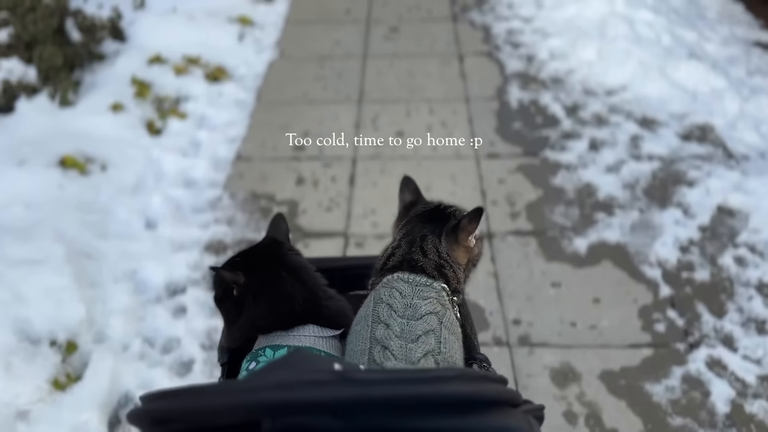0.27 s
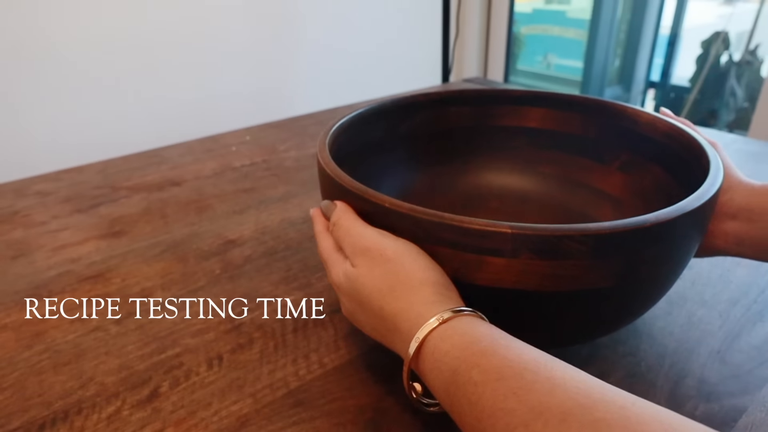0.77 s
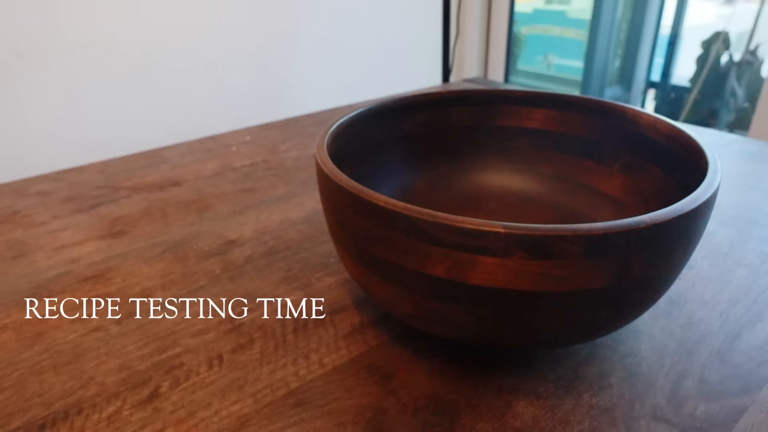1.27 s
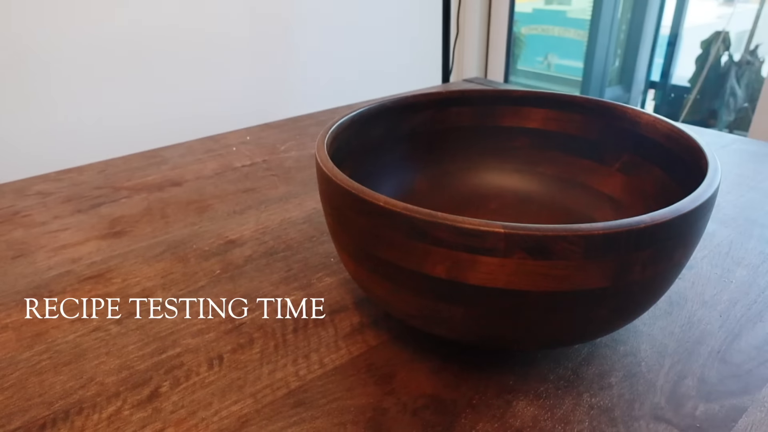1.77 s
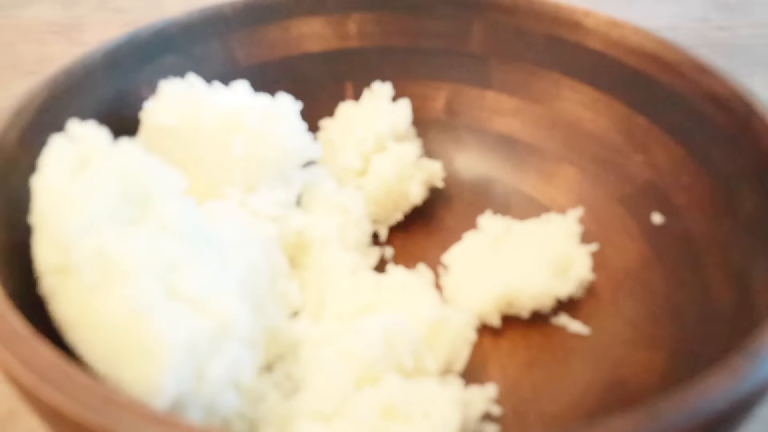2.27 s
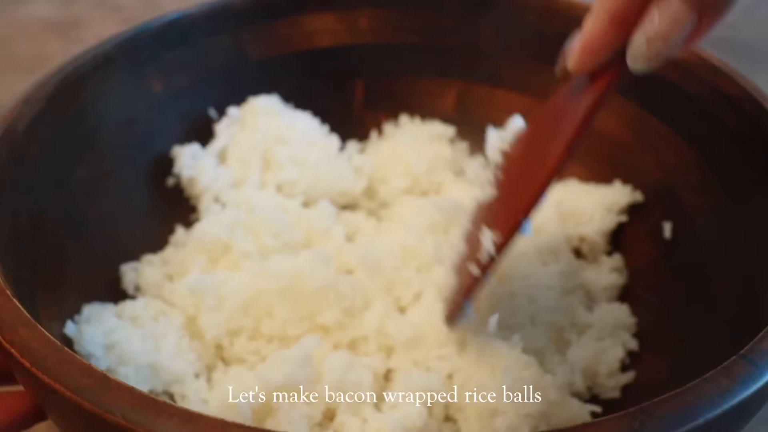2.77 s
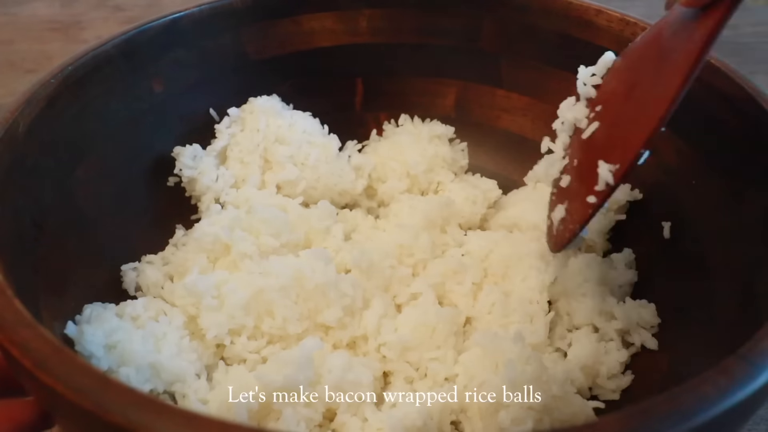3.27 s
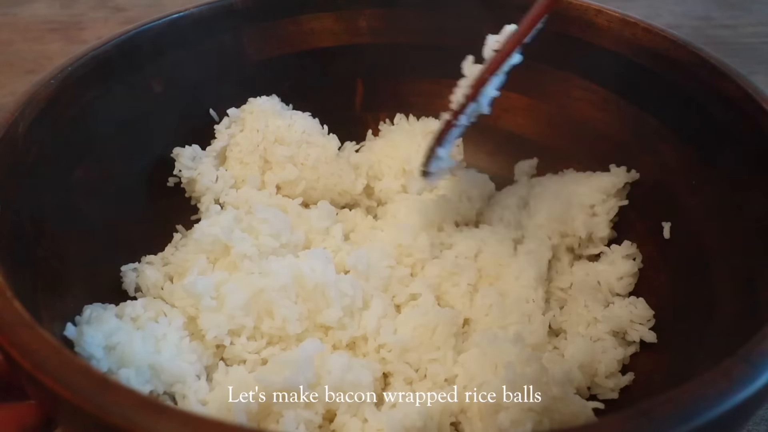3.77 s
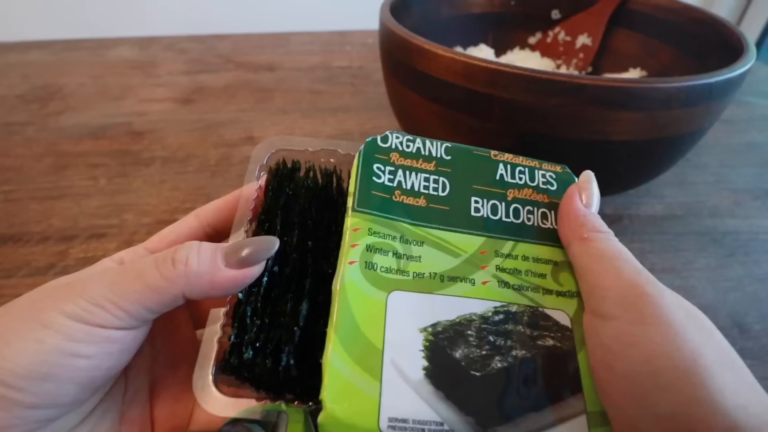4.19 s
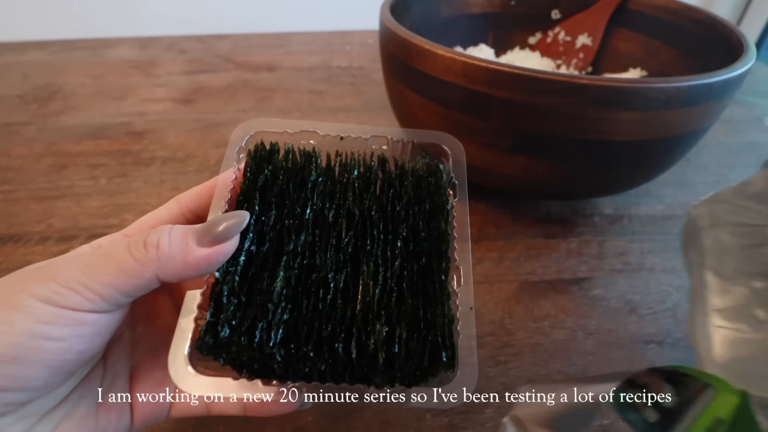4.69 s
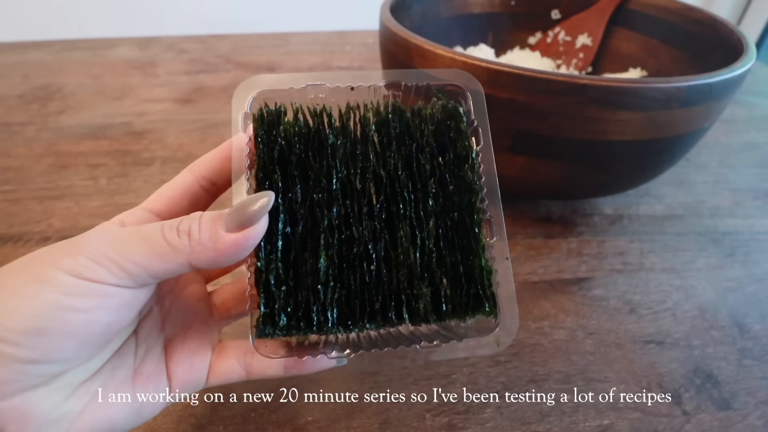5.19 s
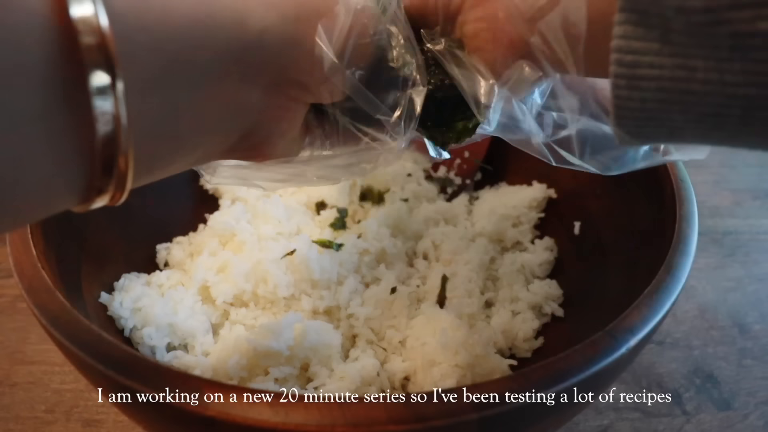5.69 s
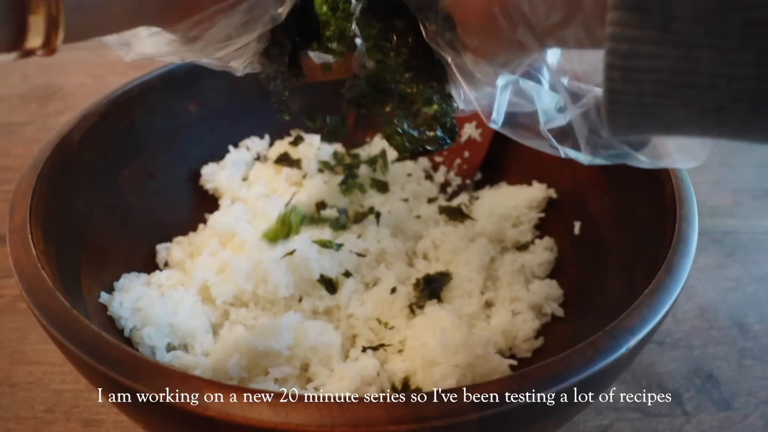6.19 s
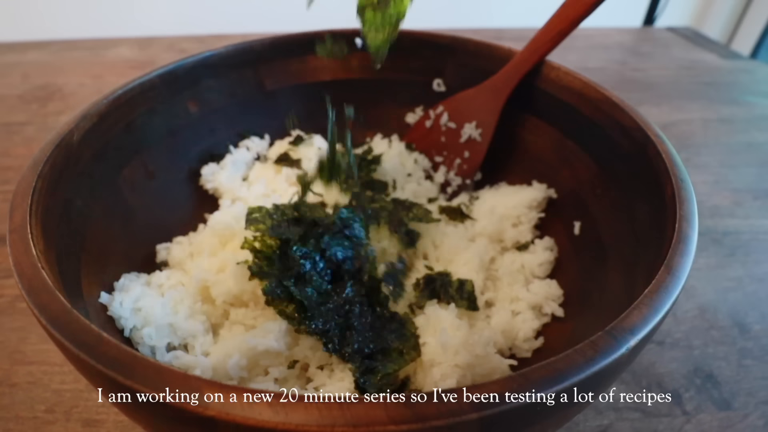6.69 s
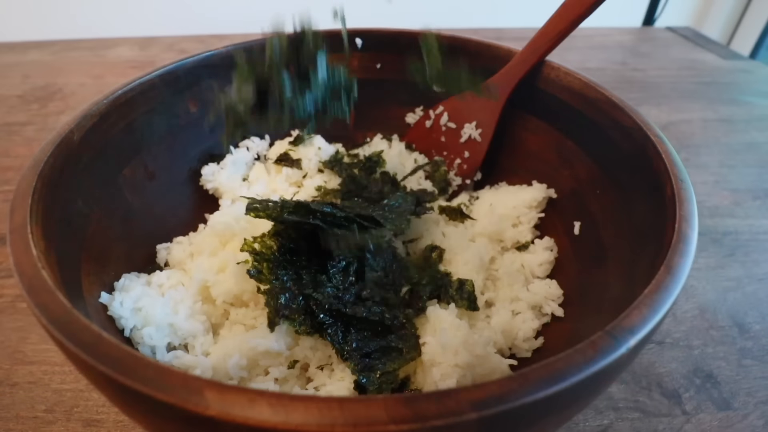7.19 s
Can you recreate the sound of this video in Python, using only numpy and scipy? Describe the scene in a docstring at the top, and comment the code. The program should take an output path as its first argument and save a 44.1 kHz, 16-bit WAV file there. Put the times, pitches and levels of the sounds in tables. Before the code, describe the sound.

Short outdoor rolling rattle cuts to a kitchen: hollow bowl thunks, soft sticky rice stirring, crackling plastic tray, then bright crinkling and sharp seaweed cracks.

```python
"""Stroller on wet paving, then rice and seaweed in a kitchen

Tyres hiss brightly and a frame rattles: crackle, noise and snaps, cut off as the kitchen begins.
A wooden bowl is set down and judders on a table: modal ring driven by contact pulses and slips.
Cooked rice squeaks in and is cut with a paddle: low pushes, sticky crackle, smacks.
A plastic seaweed tray slides out of its wrapper: scrape and buckling snaps. Hands in thin
plastic gloves crush the sheets over the rice: crinkle, cracks and low handling noise."""
import sys
import numpy as np
from scipy import signal
from scipy.io import wavfile
from scipy.ndimage import uniform_filter1d

SR = 44100
rng = np.random.default_rng(int(sys.argv[2]) if len(sys.argv) > 2 else 0)


def output_pcm(signal):
    """Save a mono or channel-first signal as 16-bit PCM at the path in sys.argv[1].

    Samples are clipped to [-1, 1] before scaling.
    """
    pcm = np.clip(np.atleast_2d(signal).T, -1, 1) * 32767
    wavfile.write(sys.argv[1], SR, np.round(pcm).astype(np.int16))


N = 328545
TIME = np.arange(N) / SR  # s
INDOORS_S, CRUSH_START_S = 0.513, 5.643  # street gives way to kitchen; hands start on the sheets
EDGE_HZ = 15950  # upper band limit

# All table levels and *_REL_DB are relative, ahead of the gains of their mix; t60/s is before filtering.

# Gloves and dry sheets
# spectrum of the crinkle [f/Hz, level/dB]
FILM_SPECTRUM = [(180, -44.5), (300, -11), (425, -8), (870, -2), (1140, -2.5), (1410, -2.5), (1970, -3.5),
                 (3950, -3), (4590, -9.5), (5700, -3.5), (6620, -7), (7690, -3), (10700, -12), (14500, -11),
                 (16000, -16)]
# narrow peaks and broad dips in the crinkle [f/Hz, half-width/Hz, height/dB]
CRINKLE_PEAKS = [(1392, 62, 7), (4000, 77, 4.5), (4900, 250, 2.5), (7700, 940, -1), (11080, 430, -4.5)]
# spectrum of the low handling rumble [f/Hz, level/dB]
HANDLING_SPECTRUM = [(15, -11), (45, -1.5), (110, 1.5), (250, -4.5), (450, -10.5), (1000, -28.5)]
# sheets break down as they are rubbed [t/s, crinkle level/dB, creases giving way/(1/s)]
RUBBING = [(5.64, -25.5, 5640), (6.4, -26, 5000), (6.55, -29.5, 2200), (6.95, -33, 690), (7.2, -34, 890),
           (7.45, -45.5, 920)]
# hands squeeze [start t/s, length/s, crinkle level/dB, rumble level/dB]
SQUEEZE_EVENTS = [(5.624, 0.043, -17, -32.5), (5.795, .07, -20, -44), (5.969, 0.077, -21, -44),
                  (6.05, 0.12, -23.5, -42), (6.299, .13, -24, -36), (6.815, 0.034, -27, -33),
                  (6.894, 0.024, -29, -26), (6.965, 0.019, -29, -28), (7.286, 0.075, -32, -44)]
# dry sheets crack [t/s, peak level/dB, tilt/(dB/octave), t60/s]
CRACK_EVENTS = [(5.644, -10, 1, .014), (5.654, -11, 6, .016), (5.9134, -8, 0, 0.015),
                (6.0211, 2.5, 4, .017), (6.0982, 0, 4, .022), (6.1484, -12, 1, 0.013),
                (6.1934, -6, 1, .018), (6.4504, -7, -1, .019), (6.6147, -6.5, -2.5, .016),
                (6.6852, -13, 2.5, 0.017), (6.7521, -8.5, -2.5, 0.021), (6.793, -14, -2.5, 0.037),
                (6.8491, -5, 1.5, .016), (6.8998, -6, 4, .013), (6.9163, -6.5, -1.5, .011),
                (6.9391, -21, -7, 0.017), (6.95, -3.5, 3, 0.018), (6.9996, -1, 2, 0.017),
                (7.0822, -5.5, 1.5, .014), (7.0929, -14, -3.5, .021), (7.1653, -6.5, 1.5, .014),
                (7.1805, -7.5, 0, .014), (7.2143, -5, 0, 0.0083), (7.233, -12, 2, .012),
                (7.2392, 2, 4.5, 0.016), (7.252, -8, 0, .013), (7.3465, -13, 0.5, .022)]
# flakes land on the rice [t/s, peak level/dB, f/Hz]
FLAKE_LANDINGS = [(6.339, -26.5, 169), (6.842, -20, 158), (6.925, -21, 205), (7.075, -28, 109),
                  (7.241, -20, 108)]
# hollow between the palms changes size [t/s, length/s, level/dB, first f/Hz, last f/Hz]
PALM_GLIDES = [(5.645, 0.038, -34, 752, 574), (5.835, 0.028, -32, 806, 480), (5.86, 0.028, -30, 470, 674),
               (5.995, 0.025, -34.5, 804, 556), (6.435, 0.036, -34.5, 592, 974),
               (6.52, 0.023, -36, 553, 295)]
SQUEEZE_RISE_S, SQUEEZE_T60_S = 0.026, 0.28
FIZZ_REL_DB, HANDLING_REL_DB = -7, -40  # crinkle above 9 kHz; steady rumble of the hands
CLUMP_SPREAD_DB, FUMBLE_SPREAD_DB = 1, 1.43  # quick clusters of creases; uneven grip
CREASE_SPREAD_DB = 2.3

# Rice and paddle
# spectrum of sticky grains [f/Hz, level/dB]
STICKY_SPECTRUM = [(350, -24), (600, -6), (1190, -12), (1410, 5), (2180, -2.5), (2440, -2), (2720, -2.5),
                   (4050, -6.5), (10700, -20), (14500, -31), (16000, -11)]
# spectrum of the table under pressure [f/Hz, level/dB]
TABLE_SPECTRUM = [(10, -11.5), (30, -3.5), (50, -18.5), (90, -24), (200, -35), (600, -64)]
# wood ring under a soft blow [f/Hz, level/dB]
SOFT_WOOD_SPECTRUM = [(120, -3.5), (200, 0.5), (330, -12.0), (600, -10.5), (1500, -26), (6000, -45)]
# murmur under the paddle [f/Hz, level/dB]
MURMUR_SPECTRUM = [(60, -5), (120, 0.5), (200, -1.5), (350, 2), (600, -6.5), (1500, -30.5)]
# rice is pressed and cut [start t/s, length/s, force level/dB, stickiness re force/dB]
PADDLE_STROKES = [(2.43, 0.21, -45, -8), (2.696, 0.094, -38.5, -15), (2.804, 0.19, -37.5, -10),
                  (3.106, .11, -35.5, -10.5), (3.39, 0.12, -36.5, -11.5), (3.627, 0.2, -37.5, -12.5),
                  (3.866, 0.15, -34, -11.5), (4.032, 0.06, -43.5, 0), (4.137, 0.049, -39, -4.5)]
# soft blows of rice and paddle on the bowl [t/s, peak level/dB, push f/Hz, wood ring re push/dB]
BOWL_PUSHES = [(1.992, -14, 41.7, -6), (2.69, -34, 110, 2.5), (2.877, -28.5, 49, -22),
               (3.05, -30, 55.5, -14), (3.13, -24.5, 51.5, -14), (3.401, -27.5, 106, -2.5),
               (3.661, -32.5, 76, 3), (3.913, -32, 70.6, 5.5), (4.17, -29.5, 49.5, -3)]
# wet grains part from the paddle [t/s, peak level/dB, tilt/(dB/octave), t60/s]
SMACK_EVENTS = [(2.0302, -20, -1, .037), (2.0574, -22.5, -2.5, .044), (2.1992, -36, -3, .04),
                (2.237, -29, -0.5, 0.071), (2.6871, -18.5, 2, 0.034), (2.8696, -30.5, 3, 0.18),
                (2.8969, -21.5, 3.5, .034), (2.9104, -20.5, 10, .055), (3.02, -26, 8, .04),
                (3.054, -28.5, -1, 0.036), (3.1356, -26.5, 6.5, 0.22), (3.4012, -30.5, -3, .04),
                (3.4187, -26.5, 5.5, .072), (3.4745, -22, 8, 0.034), (3.6663, -26, 4, 0.099),
                (3.7518, -36, -1.5, .05), (3.8656, -36.5, -5, .045), (3.905, -30, -4, 0.074),
                (3.9275, -22.5, 3.5, 0.036), (4.1778, -25.5, 0, 0.059)]
# air pockets in the rice close [t/s, length/s, level/dB, first f/Hz, last f/Hz]
SQUELCH_GLIDES = [(2.855, 0.05, -48, 945, 1720), (3.115, 0.033, -48, 1100, 1710),
                  (3.395, 0.034, -48, 2615, 2420), (3.89, 0.046, -53, 1697, 2230)]
# hiss of the slipping rice [f/Hz, level/dB]
SLIP_HISS_SPECTRUM = [(120, -54), (200, -14), (1090, -31), (1430, -2), (1630, -11), (2060, -9), (2420, -20),
                      (2950, -19), (4470, -26.5), (15000, -40.5)]
STROKE_RISE_S, STROKE_T60_S = 0.041, 0.57
LAND_START_S, SETTLE_T60_S = 1.985, 1  # the lump lands and slumps apart
LOOSE_REL_DB, LOOSE_PER_S = -62, 32  # stray grains unstick all through the stirring
SLIP_START_S, SLIP_S, SLIP_REL_DB = 1.9785, 0.018, -9  # the lump squeaks as it slips in

# Tray
# spectrum of the thin tray [f/Hz, level/dB]
TRAY_SPECTRUM = [(35, -49), (60, -4), (81, -2), (149, -15), (308, -8.5), (346, -11), (540, -10), (1310, 0),
                 (1910, -9), (3940, -7.5), (4640, -11), (8510, -12.5), (10800, -21), (14200, -20),
                 (16000, -26)]
# fingers on the tray [f/Hz, level/dB]
SCUFF_SPECTRUM = [(150, -6), (450, -1), (1400, 3), (2200, -12), (9000, -24)]
# tray buckles [t/s, peak level/dB, tilt/(dB/octave), t60/s]
BUCKLE_EVENTS = [(4.225, -6.5, -3.5, 0.045), (4.245, -0.5, 2, 0.034), (4.321, -7, -1, 0.021),
                 (4.356, -12, -3, .034), (4.376, -4.5, -2.5, 0.018), (4.417, -3.5, -2, 0.035),
                 (4.42, -11, -1, .026), (4.454, -7.5, -2.5, .019), (4.47, -7.5, -3.5, 0.023),
                 (4.544, -9, -1.1, 0.037), (4.642, -22.5, 4, 0.05), (4.666, -21.5, 3.5, .046),
                 (4.735, -24.5, 3, 0.048), (4.847, -35, 11, .025), (5.058, -30, 6.5, 0.017),
                 (5.206, -25.5, 1.3, 0.035), (5.225, -25.5, 0.5, 0.026), (5.257, -18.5, -4, 0.027),
                 (5.445, -33.5, -2, .025), (5.529, -19.5, 3.5, 0.034)]
SLIDE_START_S, SLIDE_S, SLIDE_REL_DB, SLIDE_T60_S = 4.23, 0.21, -31.5, 0.6  # wrapper along tray
SCUFF_START_S, SCUFF_S, SCUFF_REL_DB = 5.255, 0.062, -43.5  # fingers shift on the tray

# Bowl
# modes of bowl and table together [f/Hz, level/dB, t60/s]
WOOD_MODES = [(122.5, -6.5, 0.61), (165, -28, 0.16), (186.6, -5.5, 0.4), (222, -21, 0.16), (272, -32, 0.27),
              (330.6, -13, 0.16), (365.6, -16, 0.45), (470, -1, 0.25), (582, -9.5, 0.16),
              (598.4, -13.5, 0.21), (847, 5, 0.046), (1134, -8.5, 0.084), (1362, 0.5, 0.064),
              (1760, -15, 0.1), (2120, -15, .06)]
# the dense, short-lived rest of the ring [f/Hz, level/dB]
THUD_SPECTRUM = [(40, -28.5), (80, -23), (125, -7.5), (220, 1), (480, -0.5), (620, -1), (730, -7),
                 (880, -9.5), (1400, -9.5), (2000, -24), (2800, -34.5), (4500, -45), (14000, -70)]
# foot of the bowl strikes the table [t/s, peak level/dB, contact time/s]
FOOT_KNOCKS = [(0.6209, 4.5, 0.00021), (0.6252, -9, 0.00036), (0.8306, 0.9, 0.00077),
               (0.8423, -10.5, 0.0013), (0.8514, -3, 0.0014), (0.867, -15.5, 0.0026)]
# hard edge of the foot clicks as it lands [t/s, peak level/dB, tilt/(dB/octave), t60/s]
FOOT_CLICK_EVENTS = [(.6205, -7.5, -3, 0.0069), (.8312, -16, -2, .008)]
# foot judders, bass strong while it rocks on its edge [start t/s, length/s, level/dB, bass level/dB]
JUDDER_EVENTS = [(.63, .05, -18.5, -5), (0.692, 0.11, -13, -3), (0.828, 0.019, -17, -5),
                 (0.899, 0.027, -19.5, -16), (0.98, 0.052, -33, -23)]
# faint handling ticks after the bowl is set down, one bright like a bracelet
# [t/s, peak level/dB, tilt/(dB/octave), t60/s]
HANDLING_TICKS = [(.985, -38, 1, 0.065), (1.033, -31.5, 9.5, 0.024), (1.528, -37, 4, 0.026)]
JUDDER_RISE_S, JUDDER_T60_S = 0.033, 0.23
BOWL_GAIN_DB, CONTACT_SCATTER_DB = 3.5, 1.5

# Stroller
# bright tyre hiss [f/Hz, level/dB]
TYRE_HISS_SPECTRUM = [(700, -14), (1400, -10), (2400, -1.5), (4000, -1), (6200, -1.5), (8800, 8),
                      (11500, -14), (14200, 5), (16000, -7)]
# spectrum of the frame [f/Hz, level/dB]
FRAME_SPECTRUM = [(150, -25), (300, -6.5), (700, -2.5), (1100, 2), (1400, -13.5), (3000, -12.5),
                  (15000, -31)]
# spectrum of the rolling rumble [f/Hz, level/dB]
RUMBLE_SPECTRUM = [(15, -17), (50, -13), (90, -7), (160, -1), (300, -5), (600, -19), (2000, -69)]
# wheels cross rough, wet patches [start t/s, length/s, level/dB]
ROUGH_PATCHES = [(0.013, .012, -37.5), (0.099, 0.021, -36.5), (0.154, 0.069, -40)]
# wheels drop into paving joints [t/s, peak level/dB, f/Hz]
JOINT_BUMPS = [(0.277, -24, 87), (0.356, -29, 71), (0.431, -29, 70), (.489, -25, 78.5)]
# frame clacks [t/s, peak level/dB, tilt/(dB/octave), t60/s]
CLACK_EVENTS = [(0.019, -23.5, 1, .033), (0.115, -14.5, -4, 0.027), (0.161, -21, -7, 0.078),
                (0.216, -23, 1, .044), (0.339, -23.5, -6, 0.06)]
# grit under the wheels [t/s, peak level/dB, tilt/(dB/octave), t60/s]
GRIT_EVENTS = [(0.021, -21, -5.5, 0.014), (0.0583, -24.5, -4.5, .022), (0.1159, -14, 8, .02),
               (0.425, -28.5, -5, .018), (0.4608, -22, 8, .012), (0.4893, -23, 6, 0.017)]
TYRE_REL_DB, RATTLE_REL_DB, RUMBLE_REL_DB = -41, -52.5, -44.5  # steady rolling on smooth slabs
SHAKE_REL_DB = 2.5  # frame rattle on a patch, re its hiss

# Room
# background noise of the kitchen [f/Hz, level/dB]
AIR_SPECTRUM = [(15, -32), (25, -2), (33, -4), (92, -3.5), (170, -1.5), (200, -2.5), (236, -3),
                (591, -10.5), (659, -14.5), (911, -15.5), (1440, -17.5), (1650, -22), (2280, -24),
                (4250, -26), (16000, -33)]
# kitchen echo [f/Hz, t60/s]
KITCHEN_T60 = [(60, 0.44), (200, 0.78), (700, 0.65), (1400, 0.61), (4000, 0.51), (9000, 0.39),
               (16000, 0.083)]
AIR_DB = -46.5
DUCK_ABOVE_DB, RECOVER_DB_PER_S = -6, 2  # gain control


def gloves():
    """Creases of film and sheet give way in a crackle that swells per squeeze and thins to single cracks."""
    times_s, _, creases_per_s = np.transpose(RUBBING)
    grains = crackle(np.interp(TIME, times_s, creases_per_s), CREASE_SPREAD_DB, 0.0015)
    film = steady(colour(grains, FILM_SPECTRUM, peaks=CRINKLE_PEAKS), size=1500)
    top = signal.sosfiltfilt(signal.butter(3, 9000, "high", fs=SR, output="sos"), film)
    crinkle = amp(-0.97) * (film - top) + amp(FIZZ_REL_DB) * evened(top)
    quick = evened(uniform_filter1d(rng.standard_normal(N), size=200))
    slow = evened(uniform_filter1d(rng.standard_normal(N), size=900))
    clumps = amp(CLUMP_SPREAD_DB * quick + FUMBLE_SPREAD_DB * slow)
    grip, push = level(RUBBING), amp(HANDLING_REL_DB)
    for s, length_s, db, rumble_db in SQUEEZE_EVENTS:
        squeeze = gesture(s, length_s, SQUEEZE_RISE_S, SQUEEZE_T60_S)
        grip = np.hypot(grip, amp(db) * squeeze)
        push = np.hypot(push, amp(rumble_db) * squeeze)
    handling = noise(HANDLING_SPECTRUM) * push
    for s, db, hz in FLAKE_LANDINGS:
        add(handling, s, amp(db) * bump(hz, push_t60_s=0.036, rise_s=0.002))
    cracks = snaps(CRACK_EVENTS, FILM_SPECTRUM, edge=6.8, ring_hz=4100, ring_db=9,
                   ring_share=0.058, scatter=0.085)
    rubbing = (crinkle * clumps * grip + handling) * (TIME > CRUSH_START_S)
    return rubbing + cracks + glides(PALM_GLIDES, width_hz=110)


def paddle():
    """The lump slumps, then each cut pushes softly on the bowl while sticky grains pull apart."""
    slump = gesture(LAND_START_S, 0, rise_s=0.0087, t60_s=SETTLE_T60_S)
    force, tearing = np.zeros(N), amp(-40) * slump
    for s, length_s, db, sticky_db in PADDLE_STROKES:
        stroke = amp(db) * gesture(s, length_s, STROKE_RISE_S, STROKE_T60_S)
        force = force + stroke
        tearing = tearing + amp(sticky_db) * stroke
    pressing = noise(TABLE_SPECTRUM) * (amp(-2.5) * force + amp(-26) * slump)
    for s, db, hz, wood_db in BOWL_PUSHES:
        ring = peaked(colour(wood(), SOFT_WOOD_SPECTRUM))
        add(pressing, s, amp(db) * bump(hz, push_t60_s=0.098, rise_s=0.003))
        add(pressing, s, amp(db + wood_db) * ring)
    murmur = noise(MURMUR_SPECTRUM) * (amp(-13.5) * force + amp(-35) * slump)
    grains = crackle(900, 2.8, 0.0063, tone_db=4, cycles=18)
    sticky = steady(colour(grains, STICKY_SPECTRUM), size=2500) * tearing
    smacks = snaps(SMACK_EVENTS, STICKY_SPECTRUM, edge=5.1, ring_hz=2080, ring_db=4, scatter=0.17)
    stirring = gesture(LAND_START_S, 2.8, rise_s=0.42, t60_s=0.2)
    stray = crackle(LOOSE_PER_S, 3.2, 0.0018, tone_db=3.5)
    loose = amp(LOOSE_REL_DB) * evened(colour(stray, STICKY_SPECTRUM)) * stirring
    squelches = glides(SQUELCH_GLIDES, width_hz=360)
    return pressing + murmur + loose + amp(-5) * sticky + amp(4.0) * smacks + squelches


def rice_slip(hz=1395, waver=0.049):
    """A short wet stick-slip squeak of wavering pitch, with hiss around it."""
    pitch_hz = hz * (1 + waver * evened(uniform_filter1d(rng.standard_normal(N), size=60)))
    squeak = evened(np.sin(2 * np.pi * np.cumsum(pitch_hz) / SR))
    wet = amp(-7.0) * squeak + amp(-6) * noise(SLIP_HISS_SPECTRUM)
    return wet * amp(SLIP_REL_DB) * gesture(SLIP_START_S, SLIP_S, rise_s=0.0084, t60_s=0.067)


def tray():
    """The wrapper scrapes along the thin tray, which buckles with hollow snaps."""
    slide = amp(SLIDE_REL_DB) * gesture(SLIDE_START_S, SLIDE_S, rise_s=0.015, t60_s=SLIDE_T60_S)
    grains = colour(crackle(700, 5.1, 0.0027), TRAY_SPECTRUM, peaks=[(1380, 210, 4.1)])
    scrape = steady(grains, size=2000) * slide
    scuff = noise(SCUFF_SPECTRUM) * gesture(SCUFF_START_S, SCUFF_S, rise_s=0.028, t60_s=0.21)
    buckles = snaps(BUCKLE_EVENTS, TRAY_SPECTRUM, edge=2.2, ring_hz=1360, ring_db=8.0, scatter=0.14)
    return amp(-1) * scrape + amp(SCUFF_REL_DB) * scuff + amp(-2.0) * buckles


def bowl():
    """The bowl lands on one edge, judders across the table and drops flat; contact pulses drive the wood."""
    knocks = np.zeros(N)
    for s, db, contact_s in FOOT_KNOCKS:
        u = TIME[:SR // 50] / (contact_s / 4)
        pulse = u * np.exp(-u)
        struck = signal.oaconvolve(wood(dense_db=3.0, dense_t60_s=0.043), pulse)
        add(knocks, s, amp(db) * peaked(struck))
    clicks = snaps(FOOT_CLICK_EVENTS, STICKY_SPECTRUM, edge=9.2, ring_hz=2020, ring_db=15.5)
    slips = (rng.random(N) < 300 / SR) * rng.uniform(0.29, 1, N) * rng.choice([-1, 1], N)  # 300 per s
    spot = rng.integers(0, 4, N)  # each slip catches on one of four parts of the foot
    judder = sum(signal.oaconvolve(slips * (spot == k), wood(dense_db=7.0, dense_t60_s=0.066))[:N]
                 for k in range(4))
    judder = steady(judder, size=1100)
    bass = signal.sosfiltfilt(signal.butter(3, 155, fs=SR, output="sos"), judder)
    scrape = np.zeros(N)
    for s, length_s, db, bass_db in JUDDER_EVENTS:
        rocking = judder + bass * (amp(bass_db) + 0.27)
        scrape += amp(db) * gesture(s, length_s, JUDDER_RISE_S, JUDDER_T60_S) * rocking
    ticks = snaps(HANDLING_TICKS, FILM_SPECTRUM, edge=3.5, ring_hz=9000, ring_db=3)
    return amp(BOWL_GAIN_DB) * (knocks + clicks + amp(-5) * scrape) + ticks


def stroller():
    """Tyres hiss on wet slabs, rough patches shake the frame and the wheels bump over joints."""
    rough = sum(amp(db) * gesture(s, length_s, rise_s=0.0091, t60_s=0.22)
                for s, length_s, db in ROUGH_PATCHES)
    fizz = steady(colour(crackle(7000, 5.1, 0.00087), TYRE_HISS_SPECTRUM), size=2000)
    hiss = fizz * np.hypot(amp(TYRE_REL_DB), rough)
    rattle = noise(FRAME_SPECTRUM) * np.hypot(amp(RATTLE_REL_DB), amp(SHAKE_REL_DB) * rough)
    rumble = noise(RUMBLE_SPECTRUM) * np.hypot(amp(RUMBLE_REL_DB), rough)
    for s, db, hz in JOINT_BUMPS:
        add(rumble, s, amp(db) * bump(hz, push_t60_s=0.098, rise_s=0.0064))
    clacks = snaps(CLACK_EVENTS, FRAME_SPECTRUM, edge=1.3, ring_hz=942, ring_db=9.5)
    grit = snaps(GRIT_EVENTS, TYRE_HISS_SPECTRUM, edge=1.7, ring_hz=2640, ring_db=12)
    return (hiss + rattle + rumble + amp(-2.5) * clacks + amp(2.5) * grit) * (TIME < INDOORS_S)


def background():
    """Steady coloured noise of the kitchen and microphone, with two narrow peaks."""
    return amp(AIR_DB) * noise(AIR_SPECTRUM, [(1435, 72, 9.2), (182, 18, 2.8)]) * (TIME >= INDOORS_S)


def kitchen_echo(x):
    """Diffuse echo: sparse random reflections after 8 ms, each band dying at its own speed."""
    taps = rng.choice([-1., 1.], SR) * (rng.random(SR) < 3000 / SR) * (TIME[:SR] > 0.008)
    hz, t, bands = signal.stft(taps, SR, nperseg=256)
    bands = bands * dying(t, read(KITCHEN_T60, hz)[:, None])
    tail = signal.istft(bands, SR, nperseg=256)[1]
    return signal.fftconvolve(x, tail / np.linalg.norm(tail))[:N]


def wood(dense_db=0, dense_t60_s=0.086):
    """Ring of bowl and table for one contact point; each favours the modes a little differently."""
    t = TIME[:SR]
    modes = np.zeros(len(t))
    for hz, db, t60_s in WOOD_MODES:
        gain = amp(db + CONTACT_SCATTER_DB * rng.standard_normal())
        modes += gain * dying(t, t60_s) * np.sin(2 * np.pi * (hz * t + rng.random()))
    dense = colour(rng.standard_normal(len(t)) * dying(t, dense_t60_s), THUD_SPECTRUM)
    return evened(modes * np.minimum(t / 0.0011, 1)) + amp(dense_db) * evened(dense)


def bump(hz, push_t60_s, rise_s):
    """A soft, heavily damped low push, followed by an uneven shudder."""
    t = TIME[:SR // 2]
    band = signal.butter(2, [hz / 2, hz * 2], "band", fs=SR, output="sos")
    shudder = evened(signal.sosfilt(band, rng.standard_normal(len(t)))) * dying(t, 4 * push_t60_s)
    push = np.sin(2 * np.pi * hz * t) * dying(t, push_t60_s)
    return peaked((push + amp(-7) / 2 * shudder) * (1 - np.exp(-t / rise_s)))


def crackle(per_s, spread_db, tick_t60_s, tone_db=-2, cycles=9):
    """Countless tiny snaps of uneven size, each from one of many facets: a tick and a brief pitched ring."""
    size = amp(spread_db * np.minimum(rng.exponential(1, N), 4.5)) * (rng.random(N) < per_s / SR)
    at, t, out = np.flatnonzero(size[:-256]), TIME[:256], np.zeros(N)
    hz = rng.uniform(500, EDGE_HZ, N)[at, None]
    ticks = rng.standard_normal((1024, len(t))) * dying(t, tick_t60_s)
    rings = np.sin(2 * np.pi * hz * t) * dying(t, cycles / hz)
    rings /= np.linalg.norm(rings, axis=1, keepdims=True)
    grains = evened(ticks[at % len(ticks)]) + amp(tone_db) * evened(rings)
    np.add.at(out, at[:, None] + np.arange(len(t)), size[at, None] * grains)
    return out


def snaps(rows, spectrum, edge, ring_hz, ring_db, ring_share=0.036, scatter=0.13):
    """Single snaps: a sharp edge, then a brief shiver near the pitch of the material."""
    out, t = np.zeros(N), TIME[:SR // 8]
    for s, db, tilt_db, t60_s in rows:
        hz = ring_hz * np.exp(scatter * (2 * rng.random() - 1))
        burst = rng.standard_normal(len(t)) * dying(t, t60_s) + edge * (t == 0)
        snap = colour(burst, spectrum, tilt_db, [(hz, ring_share * hz, ring_db)])
        add(out, s, amp(db) * peaked(snap))
    return out


def glides(rows, width_hz):
    """Noise in a small cavity whose resonance slides as it is squeezed."""
    out, r = np.zeros(N), np.exp(-np.pi * width_hz / SR)
    for s, length_s, db, first_hz, last_hz in rows:
        n = round(length_s * SR)
        flutter = signal.lfilter([1], [1, -r], rng.standard_normal(n) + 1j * rng.standard_normal(n))
        turn = np.exp(2j * np.pi * np.cumsum(np.geomspace(first_hz, last_hz, n)) / SR)
        add(out, s, amp(db) * evened((flutter * turn).real * np.hanning(n)))
    return out


def gesture(start_s, length_s, rise_s, t60_s):
    """Envelope of one movement: linear rise, then exponential decay from start + length."""
    rise = np.clip((TIME - start_s) / rise_s, 0, 1)
    return rise * dying(np.maximum(TIME - start_s - length_s, 0), t60_s)


def dying(t, t60_s):
    """Exponential decay, 60 dB in t60_s."""
    return np.exp(-np.log(1000) * t / np.maximum(t60_s, 1e-3))


def steady(x, size):
    """Evens out slow swells, so that a level curve alone sets them."""
    power = uniform_filter1d(uniform_filter1d(x ** 2, size), size)
    return x / np.sqrt(abs(power) + 1e-12)


def noise(spectrum, peaks=()):
    """Coloured noise of rms 1."""
    return evened(colour(rng.standard_normal(N), spectrum, peaks=peaks))


def colour(x, spectrum, tilt_db=0, peaks=()):
    """Minimum-phase filter from a spectrum, a tilt per octave above 500 Hz and a few peaks or dips."""
    size = 4096
    hz = abs(np.fft.fftfreq(size, 1 / SR))
    db = read(spectrum, hz) + tilt_db * np.log2(np.maximum(hz, 500) / 500)
    for centre_hz, half_width_hz, height_db in peaks:
        db = db + height_db / (1 + ((hz - centre_hz) / half_width_hz) ** 2)
    log_gain = np.log(amp(np.maximum(db - db.max(), -90)))
    taps = np.fft.ifft(np.exp(np.conj(signal.hilbert(log_gain)))).real
    return signal.oaconvolve(x, taps[:size // 2])[:len(x)]


def read(points, hz):
    """Interpolates a table column on a log-frequency axis."""
    f, value = np.transpose(points)
    return np.interp(np.log(hz + 1), np.log(f + 1), value)


def level(rows):
    """Gain curve from a dB column, silent outside its span."""
    rows = np.array(rows)
    return amp(np.interp(TIME, rows[:, 0], rows[:, 1], left=-150, right=-150))


def add(mix, s, sound):
    """Mixes a sound in at time s."""
    part = mix[max(round(s * SR), 0):][:len(sound)]
    part += sound[:len(part)]


def amp(db):
    """Decibels to gain."""
    return 10 ** (np.asarray(db) / 20)


def evened(x):
    """Scales to rms 1."""
    return x / np.sqrt(np.mean(x ** 2) + 1e-20)


def peaked(x):
    """Scales to peak 1."""
    return x / (abs(x).max() + 1e-12)


def scene():
    """Kitchen sources straight ahead, each with its own echo level by distance; the street is wide."""
    sources = [(gloves(), -14), (paddle(), -11), (rice_slip(), -15), (tray(), -10), (bowl(), -9)]  # echo/dB
    direct = sum(sound for sound, _ in sources)
    echo = kitchen_echo(sum(amp(echo_db) * sound for sound, echo_db in sources))
    sides = np.array([stroller(), stroller()])  # same events, separate noise on each side
    street = amp(1.5) * (sides + amp(-18.5) * sides[::-1])
    return direct + echo + background() + street


def record(dry):
    """Gain control ducks after loud knocks and slowly recovers; peaks beyond full scale clip; band limit."""
    r = np.exp(-1 / (0.008 * SR))  # 8 ms power smoothing
    power_db = 10 * np.log10(signal.lfilter([1 - r], [1, -r], (dry ** 2).mean(0)) + 1e-12)
    fall_db = RECOVER_DB_PER_S * TIME
    held_db = np.maximum.accumulate(power_db + fall_db) - fall_db
    duck_db = np.maximum(held_db - DUCK_ABOVE_DB, 0)
    clipped = np.clip(dry * amp(-duck_db), -1, 1)
    low_pass = signal.firwin(511, EDGE_HZ, window=("kaiser", 9), fs=SR)
    return signal.oaconvolve(clipped, low_pass[None], "same", axes=1)


dry = scene()
out = record(dry)
output_pcm(out)
```